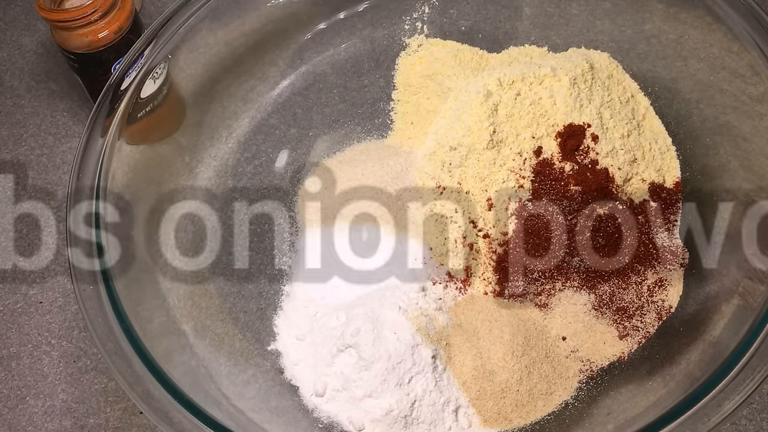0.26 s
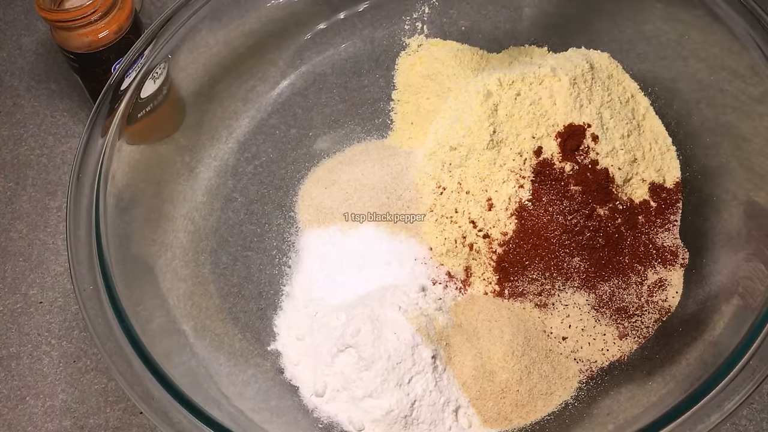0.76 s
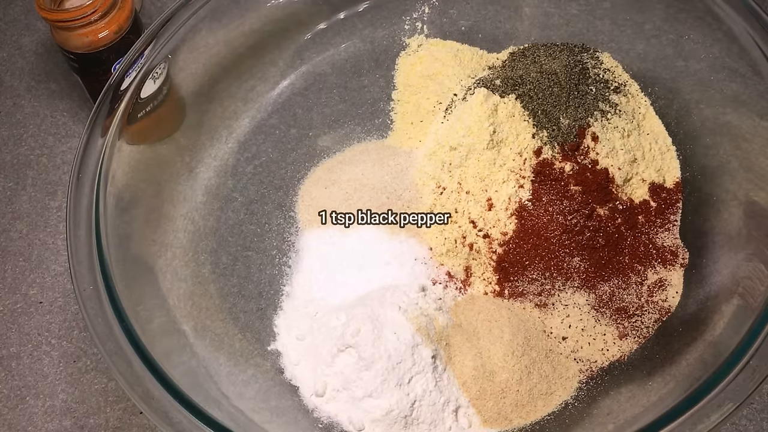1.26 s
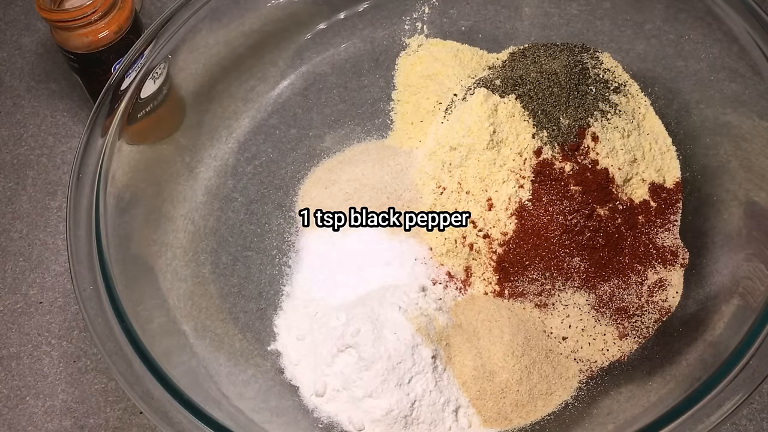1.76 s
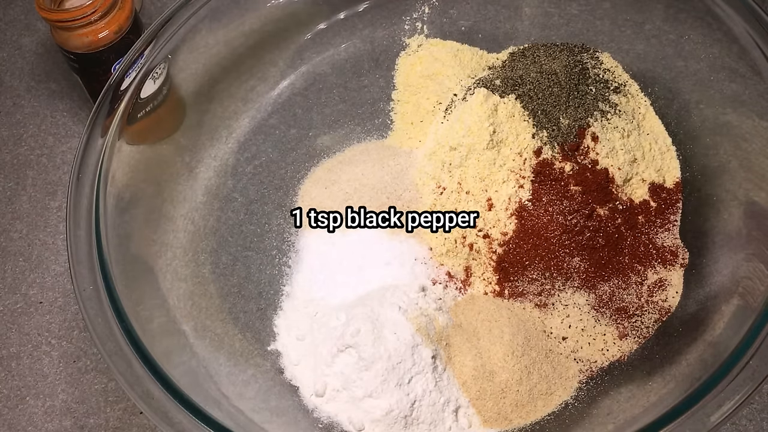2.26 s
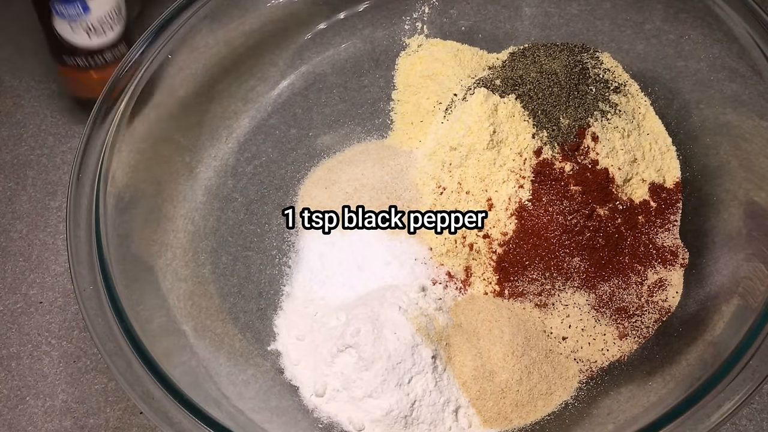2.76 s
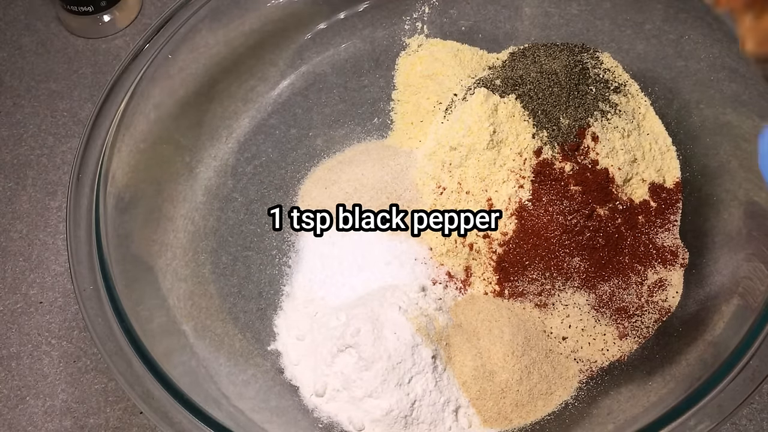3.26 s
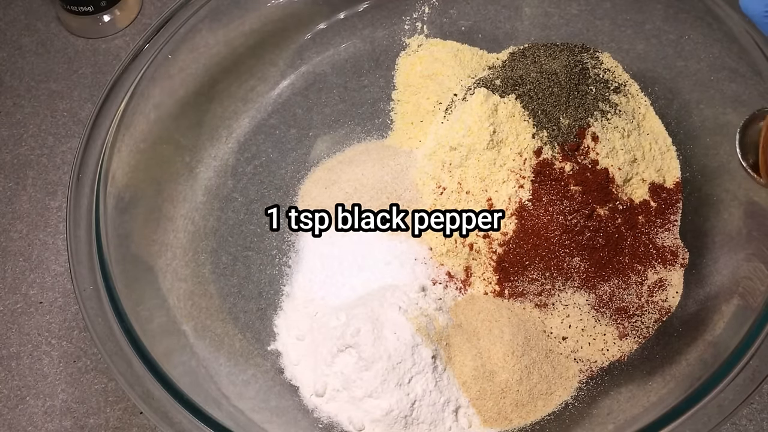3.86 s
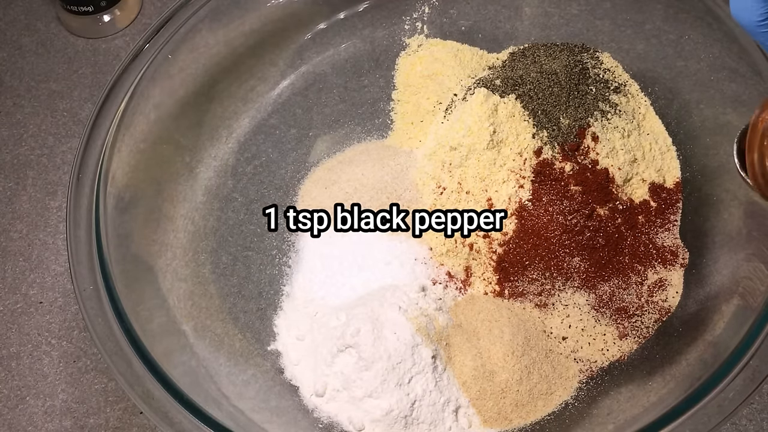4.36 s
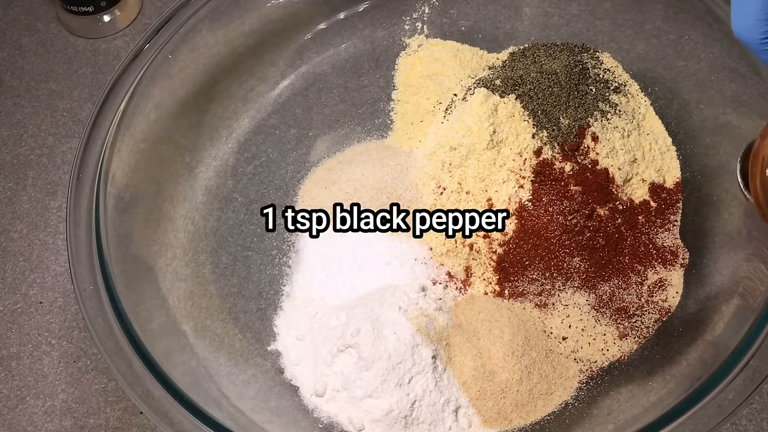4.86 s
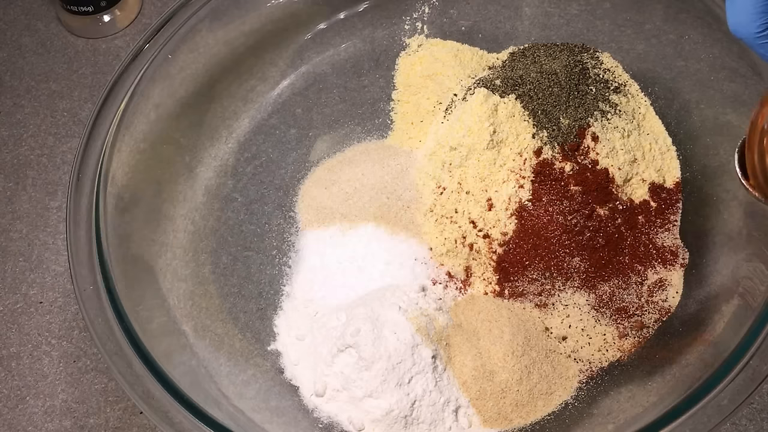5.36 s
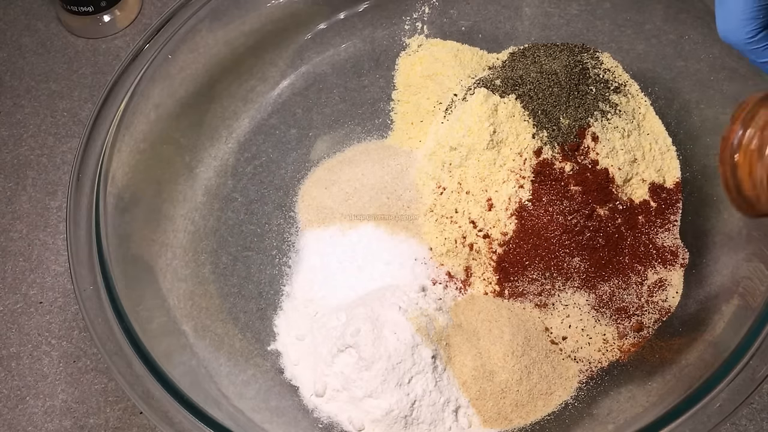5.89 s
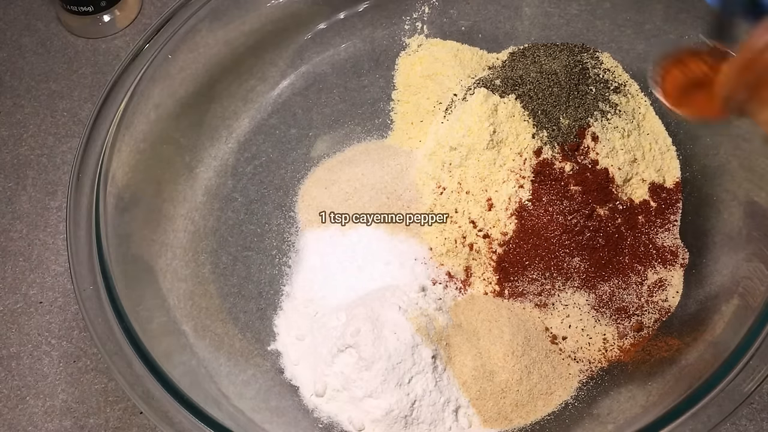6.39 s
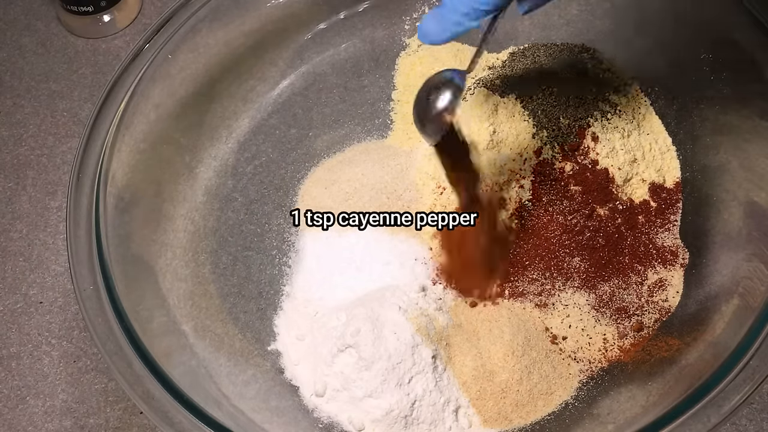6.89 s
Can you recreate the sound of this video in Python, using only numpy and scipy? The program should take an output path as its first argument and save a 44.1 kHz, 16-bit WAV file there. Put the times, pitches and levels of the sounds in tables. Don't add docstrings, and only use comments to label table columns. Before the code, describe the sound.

Spice jars knock onto a hard kitchen counter, a plastic lid scrapes and twists off, then a metal spoon taps inside a jar over a low fridge hum.

```python
import sys
import numpy as np
from scipy import signal
from scipy.fft import rfft, irfft
from scipy.io import wavfile
from scipy.ndimage import uniform_filter1d

SR = 44100
rng = np.random.default_rng(int(sys.argv[2]) if len(sys.argv) > 2 else 0)


def generate_wav(signal):
    frames = np.transpose(np.atleast_2d(signal))
    scaled = np.clip(frames, -1, 1) * 32767
    pcm = np.round(scaled).astype(np.int16)
    wavfile.write(sys.argv[1], SR, pcm)


def attenuation_scalar(level_db):
    decades = np.asarray(level_db, float) / 20
    return 10 ** decades


N = 314433

# low_hz, high_hz
KNOCK_BANDS = [(400, 1000), (1000, 1850), (2150, 13000), (110, 400)]
# pitch_hz, level_db, fade_s (time to fall by 60 dB)
LID_TONES = [(2960, -4, .014), (3500, -2, .018), (3800, -2, .016), (4380, -1, .016), (5500, -5, .014),
             (6100, -3, .014), (6950, -5, .014), (9500, -11, .016), (12800, -12, .016), (14300, -13, .016)]
LID_OFF_S = 2.7


def evened(x):
    return x / np.sqrt(np.mean(x ** 2) + 1e-20)


def read(points, hz):
    f, value = np.transpose(points)
    return np.interp(np.log(hz + 1), np.log(f + 1), value)


def add(mix, start_s, sound):
    part = mix[round(start_s * SR):][:len(sound)]
    part += sound[:len(part)]


def split(x, bands):
    rank = np.argsort(np.argsort([low for low, high in bands]))
    parts = []
    for k, pair in zip(rank, bands):
        band_filter = signal.butter(2, pair, "bandpass", fs=SR, output="sos")
        parts.append((-1) ** k * signal.sosfilt(band_filter, x))
    return parts


def mixed(parts, levels_db):
    return sum(attenuation_scalar(db) * evened(part) for part, db in zip(parts, levels_db))


def coloured(spectrum):
    hz = np.fft.rfftfreq(N, 1 / SR)
    shape = attenuation_scalar(read(spectrum, hz)) * (hz > 20)
    return evened(irfft(rfft(rng.standard_normal(N)) * shape, N))


def ringing(body, ring, scatter_db=0., detune=0.0084):
    t = np.arange(6000) / SR
    hz, db, fade_s = np.transpose(body)[:, :, None]
    luck = np.clip(rng.standard_normal((2, len(body), 1)), -2, 2)
    fading = attenuation_scalar(db + scatter_db * luck[0] - 60 * t / (ring * fade_s))
    tones = np.sin(2 * np.pi * hz * (1 + detune * luck[1]) * t)
    return (fading * tones).sum(0)


def blows(events, body, bands, last_db, follow, ring, contact_s, crack_db, crack_fade_s, scatter_db, detune):
    out, t = np.zeros(N), np.arange(6000) / SR
    for start_s, peak_db, *colour_db in events:
        tone = ringing(body, ring, scatter_db, detune) * (1 - np.exp(-t / contact_s))
        crack = evened(signal.lfilter([1], [1, -.7], rng.standard_normal(len(t))))
        crack *= attenuation_scalar(crack_db - 60 * t / (crack_fade_s * ring))
        crack *= np.minimum(2 * t / contact_s, 1)
        parts = split(tone / abs(tone).max() + crack, bands)
        levels_db = [0, *colour_db, last_db + follow * colour_db[-1]]
        for part, db in zip(parts, levels_db):
            add(out, start_s, attenuation_scalar(peak_db + db) * part / abs(part).max())
    return out


def slides(events, body, ring, tilt_db):
    out = np.zeros(N)
    tilted = [(hz, level + tilt_db * np.log2(hz / 1000), fade_s) for hz, level, fade_s in body]
    for start_s, length_s, db in events:
        n = int(length_s * SR)
        stroke = signal.windows.tukey(n, .4) * np.linspace(1.2, .7, n)
        slips = rng.standard_normal(4000)[:n] * stroke
        murmur = signal.fftconvolve(slips, ringing(tilted, ring))[:n + 800]
        add(out, start_s, attenuation_scalar(db) * evened(murmur))
    return out


def fridge():
    # pitch_hz, level_db (per Hz)
    room_noise = [(15, -50), (25, -21), (35, -17), (48, -1.5), (86, -9.5), (192, -9), (262, -18.5),
                  (461, -24), (659, -28.5), (1200, -50), (1560, -65)]
    # pitch_hz, width_hz, level_db
    resonances = [(58, 5, -52), (190, 16, -55), (120, 30, -56), (315, 20, -68), (463, 22, -65)]
    # pitch_hz, level_db
    motor_tones = [(58, -50), (189, -47.5), (463, -82)]
    hz = np.fft.rfftfreq(N, 1 / SR)
    out = attenuation_scalar(-48.5) * coloured(room_noise)
    for centre, width, db in resonances:
        peak = 1 + (2 * (hz - centre) / width) ** 2
        out += attenuation_scalar(db) * evened(irfft(rfft(rng.standard_normal(N)) / peak, N))
    for tone_hz, db in motor_tones:
        waver = evened(irfft(rfft(rng.standard_normal(N)) * (hz < 6.), N))
        turns = np.cumsum(tone_hz * (1 + 0.02116 * waver)) / SR
        out += attenuation_scalar(db + 1) * np.sin(2 * np.pi * turns)
    return out


def microphone_hiss():
    # pitch_hz, level_db (per Hz)
    hiss_curve = [(530, -24.5), (900, -3), (1050, -12), (1510, -10), (1950, -15), (2300, -15), (3340, -20),
                  (6110, -27), (6970, -33), (8050, -38), (14900, -26), (16000, -53)]
    return attenuation_scalar(-68.5) * coloured(hiss_curve)


def rustle():
    # time_s, level_db
    busy_points = [(0, -70), (.8, -72), (1.0, -66), (1.15, -65), (1.5, -73), (1.8, -69.5), (2.06, -65.5),
                   (2.18, -53.5), (2.3, -75), (2.48, -54.5), (2.65, -67.5), (2.9, -73), (3.04, -68.5),
                   (3.2, -72), (3.55, -66), (4.05, -68), (4.3, -74), (7.13, -72.5)]
    t = np.arange(N) / SR
    busy_db = np.interp(t, *np.transpose(busy_points))
    cover_start_s, cover_end_s, cover_fade_s = 3.12, 4.16, 0.055
    shade = np.clip(np.minimum(t - cover_start_s, cover_end_s - t) / cover_fade_s + .5, 0, 1)
    low_db = -24.5 + 0.54 * busy_db - 32 * shade
    low_db += 1 * (t > cover_end_s)
    low, high, hollow = split(rng.standard_normal(N), [(725, 3160), (2260, 9100), (757, 1010)])
    gusts = attenuation_scalar(1.8 * evened(uniform_filter1d(rng.standard_normal(N), size=900)))
    low_part = evened(low) + 1.3 * evened(hollow)
    return mixed([low_part, high * gusts], [low_db - 4.5, busy_db - 4.5])


def squeaks():
    # start_s, length_s, pitch_hz, level_db
    squeak_events = [(0.585, 0.052, 1670, -57), (1.6, 0.081, 4450, -66), (1.67, 0.033, 3500, -60),
                     (1.66, .012, 7200, -60), (1.772, 0.031, 3500, -54), (1.795, .03, 6000, -58),
                     (1.76, 0.052, 9400, -57), (3.453, .018, 4000, -64), (2.482, .014, 3400, -53),
                     (1.77, 0.038, 14500, -58), (1.973, 0.041, 9600, -66), (2.003, 0.016, 5900, -46),
                     (2.107, .025, 9500, -48), (2.108, 0.022, 1540, -54), (0.59, .016, 2200, -62),
                     (0.569, .012, 1900, -57), (2.165, .035, 4100, -52), (2.204, 0.055, 9300, -59),
                     (2.348, .03, 9400, -70), (2.355, .045, 14300, -72), (2.447, 0.017, 5700, -53.5),
                     (2.63, .02, 13000, -73), (3.09, .022, 3670, -55.5), (3.51, 0.025, 3700, -53),
                     (4.025, 0.017, 6900, -55.5), (4.18, 0.022, 3580, -62.5), (6.05, 0.016, 3600, -57),
                     (6.075, 0.034, 1920, -55), (6.188, 0.028, 2810, -63), (6.804, 0.021, 3700, -57)]
    out = np.zeros(N)
    for start_s, length_s, hz, db in squeak_events:
        n, width_hz = int(length_s * SR), 12 / length_s
        (band,) = split(rng.standard_normal(4000), [(hz - width_hz / 2, hz + width_hz / 2)])
        add(out, start_s, attenuation_scalar(db) * evened(band[-n:]) * signal.windows.tukey(n, .5))
    return out


def first_jar():
    # start_s, knock_peak_db, then clack_db and edge_db relative to it
    knocks = [
        (0.5695, -47, -3, -27),
        (0.572, -38, -6, -22),
        (0.59, -45, -9, -20),
        (0.946, -17, -5, -1),
        (0.953, -26, -0.5, -4),
        (0.958, -28.5, -4, 3),
        (0.971, -35, 3, -1),
        (0.976, -37, -3, 2),
    ]
    # pitch_hz, level_db, fade_s
    body = [(290, -10, 0.071), (500, -0.5, 0.12), (640, -7, 0.32), (740, -9, 0.23), (880, 4, 0.14),
            (919, -4.5, 0.24), (1050, -1, 0.19), (1216, -8, 0.3), (1265, -2, 0.32), (1372, 0.5, 0.32),
            (1536, -1, 0.19), (1682, -2.5, 0.37), (2350, -10, 0.15), (2920, -15, 0.22)]
    # start_s, length_s, level_db
    drags = [
        (0.576, 0.03, -50),
        (0.608, .04, -61),
        (0.98, .065, -54.5),
    ]
    out = blows(knocks, body, KNOCK_BANDS, last_db=-24, follow=.1, ring=0.22, contact_s=0.00083,
                crack_db=-5, crack_fade_s=0.2, scatter_db=1.5, detune=0.0032)
    return out + slides(drags, body, ring=0.12, tilt_db=-4.0)


def counter():
    # start_s, pitch_hz, peak_db, fade_s
    thumps = [
        (0.571, 231, -37, .04),
        (0.571, 575, -40, .03),
        (2.536, 576, -21.5, .1),
        (0.948, 185, -30, 0.043),
        (2.535, 178, -34, 0.092),
        (2.922, 162, -22, 0.045),
    ]
    out = np.zeros(N)
    for start_s, *tone in thumps:
        add(out, start_s, ringing([tone], 0.9))
    return out


def lid_ticks():
    # start_s, middle_peak_db, then low_db and high_db relative to it
    ticks = [(0.6649, -60, -3, 8), (0.7157, -49, -8, 5.5), (0.7655, -52, -22, -6), (1.7374, -44, 0, -13),
             (1.7608, -37, -23, -4), (1.9623, -57, 3, -4), (2.0078, -52, -21, -24), (2.139, -32, 6.5, -6),
             (2.2298, -42, -7, -14), (2.3087, -39, -4, -1.5), (2.471, -65, 0.5, -12),
             (2.4862, -41, -10, -7), (2.553, -50.5, -6, 13), (3.1665, -37.5, -1.5, -7), (3.375, -59, 5, -9),
             (3.872, -64, 5, -1), (4.166, -66, -8, 8), (4.184, -54.5, 4, -5), (4.46, -64, 6, -8),
             (5.173, -54, 1, -5), (6.8314, -68, 19, 9)]
    # low_hz, high_hz
    bands = [(4800, 8000), (2300, 4800), (8000, 11000), (11000, 15800)]
    return blows(ticks, LID_TONES, bands, last_db=-6, follow=1, ring=0.71, contact_s=.001,
                 crack_db=-2, crack_fade_s=.03, scatter_db=4., detune=.013)


def rubs():
    # start_s, length_s, level_db, then middle_db and high_db relative to it
    lid_strokes = [(0.989, 0.031, -62, -6, -2.5), (1.246, 0.033, -79, -12, 5), (1.592, 0.1, -64.5, -7, -15),
                   (1.657, 0.05, -58, 2, -32), (1.746, 0.043, -57, 3, -11), (1.76, 0.076, -62, 4.5, -3),
                   (1.822, 0.08, -81.5, 9.5, 8), (1.9, 0.054, -70, -2, 5.5), (1.967, 0.027, -71, 6, 10.5),
                   (1.995, 0.061, -63.5, 1, 1), (2.096, 0.048, -42, -4.5, -4.5),
                   (2.135, 0.081, -54, -13, -6.5), (2.201, 0.065, -60, -3, -3),
                   (2.278, 0.051, -54.5, -11, -14), (2.327, 0.065, -65.5, -3, -12),
                   (2.378, 0.026, -62, -9, -17), (2.449, 0.015, -52.5, -31, -7),
                   (2.472, 0.054, -58, -16, -4), (2.621, 0.027, -59, -10, -5.5)]
    # start_s, length_s, level_db, then high_db and body_db relative to it
    jar_strokes = [(2.821, 0.12, -82, -8, 8.5), (3.068, 0.035, -68.5, -17, -16), (3.343, 0.06, -72, 4, 4),
                   (3.508, 0.04, -60.5, -14, -37), (3.935, 0.044, -72, 6.5, -2),
                   (4.028, 0.028, -65, 3, -27), (3.88, 0.3, -84, 13, 0), (4.398, 0.022, -70.5, -4, -2),
                   (5.423, 0.043, -73.5, -4, 11), (5.681, 0.02, -71, -33, -9),
                   (5.734, 0.032, -76, -12, 11.5), (6.044, 0.017, -73, -20, 5), (6.068, 0.033, -78, -4, 15),
                   (6.175, .046, -68, -10, 4), (6.755, 0.049, -76.5, -12, 11.5),
                   (6.807, 0.021, -67.5, -20, -3)]
    strokes = [(s, n, db, db + mid, db + high, db - 24) for s, n, db, mid, high in lid_strokes]
    for s, n, db, high, body in jar_strokes:
        strokes.append((s, n, db, db - 1 + 0.16 * high, db + high, db + body))
    return strokes


def rubbing():
    # low_hz, high_hz
    rub_bands = [(2400, 4800), (4800, 8000), (8000, 19000), (1000, 2400)]
    out = np.zeros(N)
    for start_s, length_s, *levels_db in rubs():
        n = int(length_s * SR)
        slips = rng.standard_normal(n) * attenuation_scalar(2.5 * np.minimum(rng.exponential(1, n), 4))
        slips *= signal.windows.tukey(n, .6) * np.linspace(1.2, .7, n)
        slips *= attenuation_scalar(3 * evened(uniform_filter1d(rng.standard_normal(n), 150)))
        ring = .5 if 1.5 < start_s < LID_OFF_S else .2
        plastic = ringing(LID_TONES, ring, scatter_db=3., detune=.025)[:1000]
        shaken = evened(signal.fftconvolve(slips, plastic)[:n + 600])
        shaken[:n] += 1.1 * evened(signal.lfilter([1], [1, -.6], slips))
        add(out, start_s, mixed(split(shaken, rub_bands), levels_db))
    return out


def second_jar():
    # start_s, knock_peak_db, then thud_db and clack_db relative to it
    knocks = [(2.221, -64, -9, 18), (2.248, -61.5, -9, 20), (2.305, -24.5, -3, -20), (2.486, -37, -20, 1),
              (2.5305, -21.5, -26, -0.5), (2.536, -10.5, -20, -19), (2.551, -31.5, -23, -17),
              (2.560, -35, -36, -18), (3.425, -43, 9, -6), (3.437, -49.5, -10, 6), (3.561, -54.5, 8, 0)]
    # pitch_hz, level_db, fade_s
    body = [(287, -32, 0.058), (462.3, -1.5, 0.085), (576, 7.5, 0.12), (670, 0.5, 0.084), (838, 5.5, 0.11),
            (1098, 1, 0.14), (1163, -2.5, 0.15), (1412, -6, 0.16), (1556, -8.5, 0.13), (1780, -28, 0.08),
            (2350, -22, .05), (2900, -26, .05)]
    # low_hz, high_hz
    bands = [(400, 1000), (110, 400), (1000, 2100), (2100, 4500)]
    # start_s, length_s, level_db
    drags = [
        (2.482, 0.044, -43),
        (2.108, 0.035, -56.5),
    ]
    out = blows(knocks, body, bands, last_db=-11.5, follow=1, ring=0.26, contact_s=0.00056,
                crack_db=-3, crack_fade_s=0.051, scatter_db=2.5, detune=0.0053)
    return out + slides(drags, body, ring=.15, tilt_db=12.5)


def third_jar():
    # start_s, knock_peak_db, then clack_db and edge_db relative to it
    knocks = [
        (2.922, -26.5, -3, -2),
        (2.935, -25.5, 4, -9.5),
        (2.945, -30, -12, -14),
    ]
    # pitch_hz, level_db, fade_s
    body = [(161.4, -12, 0.14), (238, 5.5, 0.11), (407, -3, 0.14), (510, 0, 0.25), (620, -2.5, 0.3),
            (845, -8, 0.12), (933, 1, 0.09), (1286, -4, 0.11), (1440, -5.5, 0.14), (1640, -10, 0.11),
            (1980, -10.5, 0.11), (2270, -12, 0.11), (2890, -9, 0.087), (4020, -12, 0.092)]
    # start_s, length_s, level_db
    drags = [
        (2.945, 0.063, -48),
    ]
    out = blows(knocks, body, KNOCK_BANDS, last_db=2.6, follow=1.1, ring=0.21, contact_s=0.0012,
                crack_db=-3.5, crack_fade_s=0.089, scatter_db=1.5, detune=.006)
    return out + slides(drags, body, ring=0.14, tilt_db=4.0)


def neck_taps():
    # start_s, wall_peak_db, then hollow_db and neck_db relative to it
    taps = [(4.4094, -55, -3, -15), (4.5006, -57.5, 4, 11), (4.5067, -50, 6, 8.5), (4.7892, -39, 0.5, -2),
            (4.905, -53.5, -6, 2.5), (4.9621, -56, -2, -8), (5.216, -51.5, 0, 5), (5.2365, -51, 8.5, 5),
            (5.3118, -32, -5.5, -1.5), (5.5291, -36, 2.5, -10), (5.7342, -48, 1.5, -22),
            (5.906, -59, 11, -3), (6.0754, -52.5, -1, 5), (6.1822, -52, -5, -7),
            (6.2725, -29.5, -1.5, -6.5), (6.3512, -50.5, 2, 0), (6.4207, -26.5, -6.5, -8),
            (6.5188, -35, -6.5, -6.5), (6.5893, -26, -6.5, -11), (6.6772, -25, -8.5, -9.5),
            (6.9351, -56.5, 7, 2)]
    # pitch_hz, level_db, fade_s
    body = [(695, -6.5, 0.033), (1020, 0.5, 0.041), (1600, -4, .025), (1934, -8.5, 0.024),
            (2135, -10.5, 0.026), (2464, -6.5, 0.026), (2735, -5, 0.025), (2935, -5, 0.022),
            (3300, -10.5, 0.016), (3780, -7, 0.021), (4970, -13.5, 0.023), (5560, -9, 0.023),
            (6290, -5, 0.019), (8600, -10.5, 0.024)]
    # low_hz, high_hz
    bands = [(2300, 4600), (600, 1250), (1250, 2300), (4600, 12500)]
    return blows(taps, body, bands, last_db=-6.5, follow=0.43, ring=0.84, contact_s=0.00041,
                 crack_db=-4, crack_fade_s=0.021, scatter_db=2.0, detune=0.021)


def rim_taps():
    # start_s, wall_peak_db, then hollow_db and neck_db relative to it
    taps = [
        (5.6296, -29, -7, -40),
        (5.8102, -25, -3, -2),
        (6.0062, -39, -4, 2.5),
        (6.86, -24.5, -9.5, -31),
    ]
    # pitch_hz, level_db, fade_s
    body = [(880, -29, 0.012), (1460, -1, 0.021), (1610, 0.5, 0.024), (1920, -9.5, 0.079), (2700, 6, 0.011),
            (3670, 0.5, 0.014), (4730, -0.5, 0.015), (5600, -3, 0.019), (6400, -17, 0.014)]
    # low_hz, high_hz
    bands = [(2300, 4600), (600, 1250), (1250, 2300), (4600, 15500)]
    # start_s, length_s, level_db
    drags = [
        (5.815, 0.031, -57),
        (5.635, .035, -69),
    ]
    out = blows(taps, body, bands, last_db=-10.5, follow=0.033, ring=0.65, contact_s=.0003,
                crack_db=-6.5, crack_fade_s=0.024, scatter_db=1.0, detune=0.01)
    return out + slides(drags, body, ring=0.37, tilt_db=-5.0)


def powder(spoon):
    keep = np.exp(-1 / (0.021 * SR))
    shake = signal.lfilter([1 - keep], [1, -keep], abs(spoon))
    air_hz, spread = 970, 0.031
    air_bands = [(k * air_hz * (1 - spread), k * air_hz * (1 + spread)) for k in range(1, 4)]
    noise = rng.standard_normal(N)
    dry_grains = evened(split(noise, [(1300, 5800)])[0])
    singing_air = evened(sum(split(noise, air_bands)))
    return attenuation_scalar(-10.5) * shake * evened(dry_grains + 1.3 * singing_air)


def echoes():
    # pitch_hz, fade_s
    fading = [(200, .17), (1000, .19), (3000, .14), (8000, .095)]
    taps = np.zeros(SR // 3)
    at = np.arange(200, len(taps) - 8, 8)
    taps[at + rng.integers(0, 8, len(at))] = rng.choice([-1., 1.], len(at))
    hz, t, z = signal.stft(taps, SR, nperseg=128)
    decay = attenuation_scalar(-60 * t / read(fading, hz)[:, None])
    tail = signal.istft(z * decay, SR, nperseg=128)[1]
    return tail / np.linalg.norm(tail)


def room(x):
    turn = 2 * np.pi * 3.7 * np.arange(N) / SR
    shares = [np.sqrt(2 / 3) * np.cos(turn + k * np.pi / 3) for k in range(3)]
    return sum(signal.fftconvolve(x * share, echoes())[:N] for share in shares)


def scene():
    background = fridge() + microphone_hiss() + rustle()
    first, second, third = first_jar(), second_jar(), third_jar()
    lid = squeaks() + lid_ticks() + rubbing()
    spoon = neck_taps() + rim_taps()
    hits = first + second + third + counter() + spoon + powder(spoon) + lid
    to_room = attenuation_scalar(-16.0) * (first + second) + attenuation_scalar(-12.0) * third
    to_room += attenuation_scalar(-18.0) * spoon + attenuation_scalar(-11.5) * lid
    mono = hits + room(to_room) + background
    return np.array([mono, mono])


def roll_off(x):
    return signal.sosfilt(signal.butter(12, 16450, fs=SR, output="sos"), x)


def record(dry):
    skewed = np.array([np.roll(dry[0], 1), dry[1]])
    edge = signal.firwin(255, 15900, window=("kaiser", 8), fs=SR)
    return roll_off(signal.oaconvolve(skewed, edge[None], "same"))


dry = scene()
out = record(dry)
generate_wav(out)
```